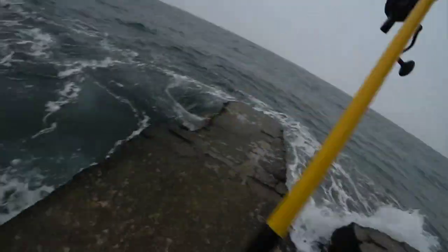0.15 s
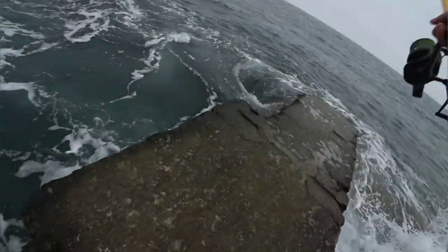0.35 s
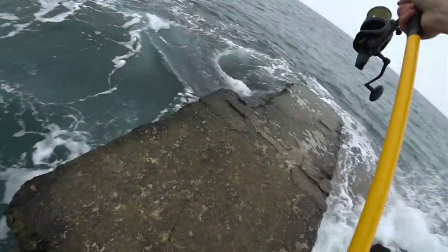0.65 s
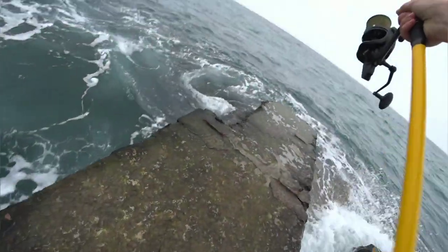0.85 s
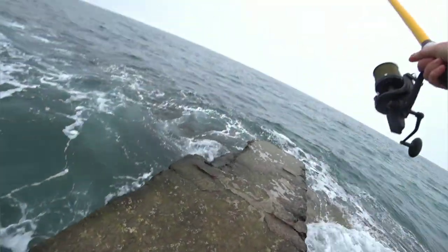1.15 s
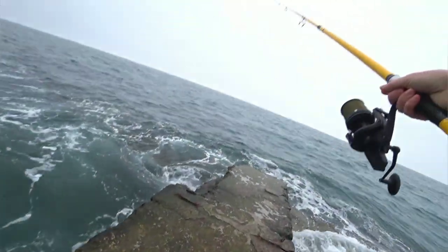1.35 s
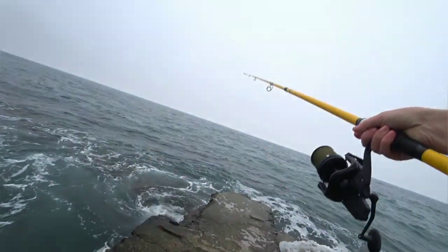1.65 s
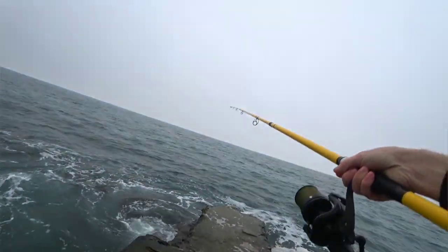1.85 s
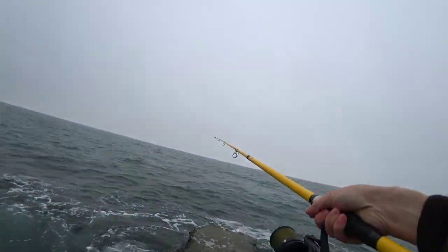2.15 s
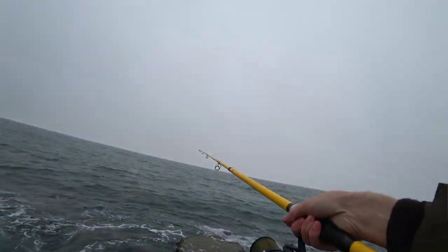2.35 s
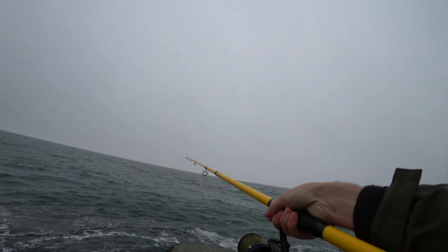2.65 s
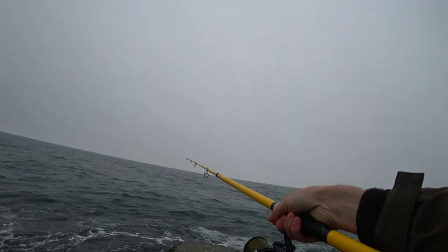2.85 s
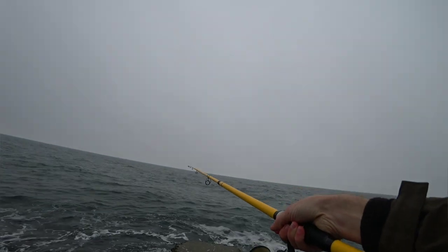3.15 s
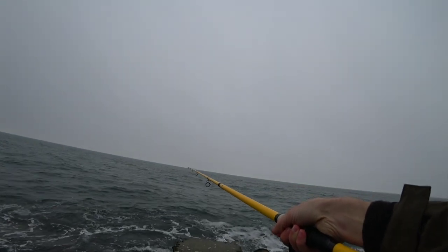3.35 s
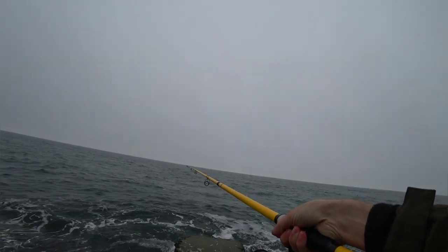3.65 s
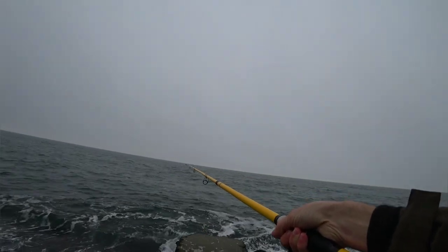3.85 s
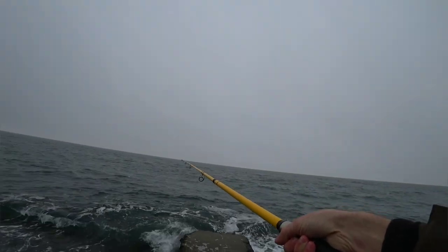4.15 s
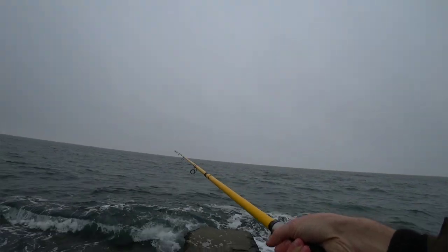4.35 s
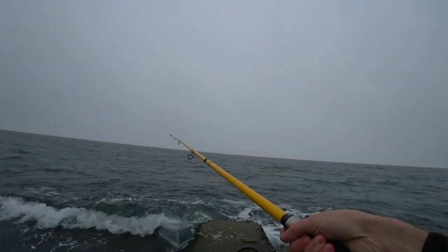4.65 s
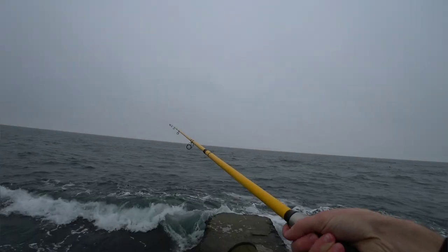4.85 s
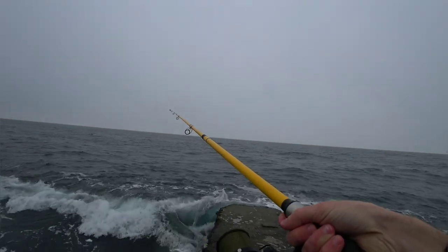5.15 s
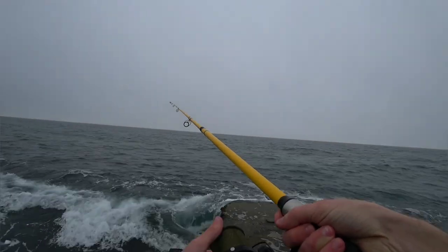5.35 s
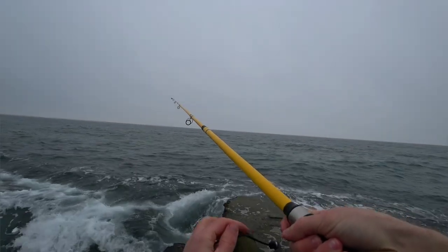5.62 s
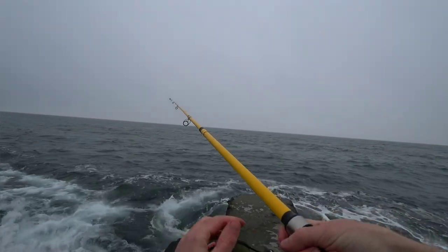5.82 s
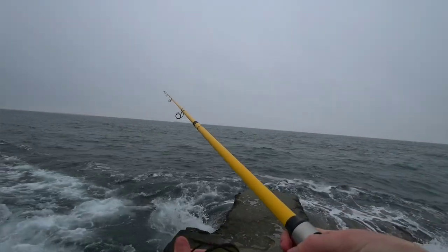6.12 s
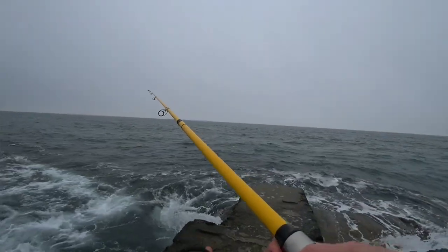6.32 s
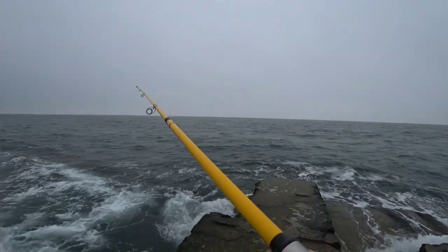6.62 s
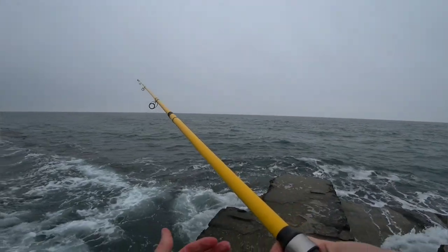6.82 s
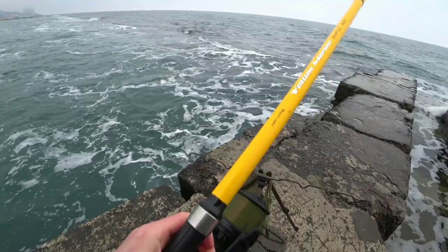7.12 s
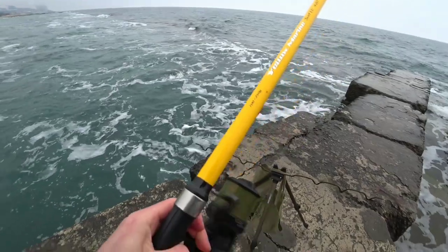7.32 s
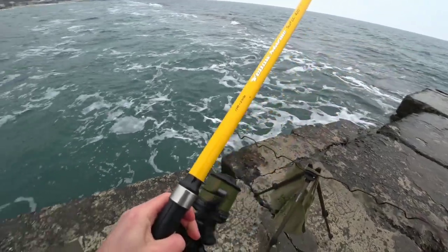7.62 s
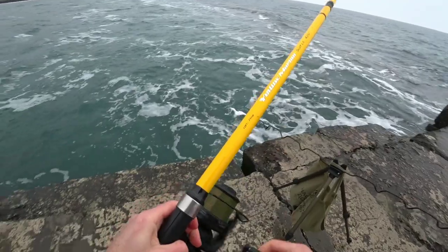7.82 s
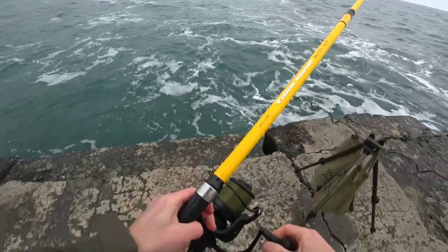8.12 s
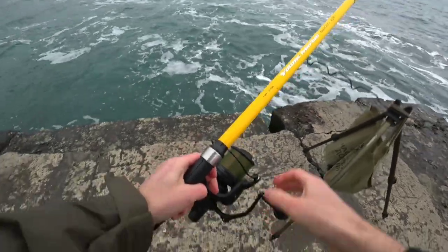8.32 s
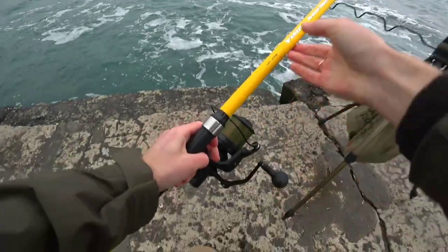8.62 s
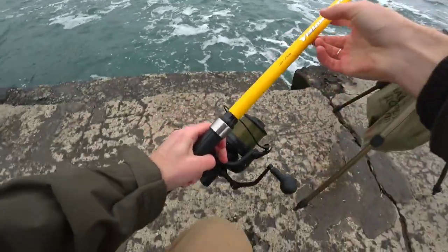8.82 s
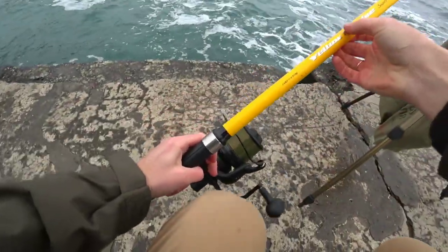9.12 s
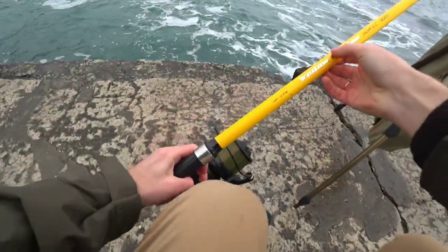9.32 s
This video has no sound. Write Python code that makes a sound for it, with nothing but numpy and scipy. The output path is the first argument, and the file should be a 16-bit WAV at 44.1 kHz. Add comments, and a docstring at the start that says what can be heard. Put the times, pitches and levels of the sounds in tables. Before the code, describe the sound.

Storm surf on a concrete pier, heard close up in open air, a dense grainy hiss of foam over a modest low roar. Tiny metallic tackle clicks come at 0 and 0.3 s. A wave swells at 0.7 s and slaps the blocks around 0.85 s, with a sharp click at 1.4 s. From 1.1 to 3.4 s, a reel whirs in five brief, thin, high metallic swells, about half a second apart, as the wash sinks. At 4.2 s foam rushes up again and stays strong and churning. One loud, bright clack strikes at 5.5 s; splashes and clicks at 6.5 s, then a double wet thump with rattle at 6.8 s. Just before 7 s an abrupt cut drops to far quieter, softer wash, with faint clicks, light slaps and a cluster of close drips around 8 s, fading gently until 9.5 s.

```python
"""Storm surf and a fishing reel

Storm waves wash over the concrete blocks of a pier while an angler winds a reel.
The surf is flickering bands of noise with sparse pops; bursts, foam and ringing drops stand out of it.
The reel sings as narrow metal resonances, one swell per handle turn, and its tackle clicks now and then.
At about 7 s the scene cuts, with a brief dip in level, to a quieter stretch of wash.
"""
import sys
import numpy as np
from scipy import signal
from scipy.fft import rfft, irfft, next_fast_len
from scipy.io import wavfile
from scipy.ndimage import uniform_filter1d

SR = 44100
rng = np.random.default_rng(int(sys.argv[2]) if len(sys.argv) > 2 else 0)


def file_out(sig):
    """Save sig as 16-bit WAV at sys.argv[1]."""
    # one column per channel
    cols = np.atleast_2d(sig).T
    # limit, then scale
    lim = np.clip(cols, -1, 1)
    pcm = np.round(lim * 32767).astype(np.int16)
    wavfile.write(sys.argv[1], SR, pcm)


N = 417627
STEP = 32   # samples between control points

# Surf level, one list before and one after the cut between scenes: start_s, roar_db, wash_db
SURF_LEVELS = [
    [(0.0, -32, -33), (0.33, -31.5, -34.5), (0.52, -34.5, -32), (0.76, -29.5, -28), (0.91, -32.5, -28),
     (1.14, -34, -32), (1.92, -38, -40.5), (2.11, -36.5, -38.5), (2.31, -35, -39.5), (2.62, -36.5, -38.5),
     (3.07, -34.5, -35), (3.37, -37, -37.5), (3.65, -34.5, -36), (4.02, -38.5, -38), (4.27, -38, -33),
     (4.54, -32.5, -29), (4.66, -32, -30), (5.08, -32.5, -29.5), (5.37, -33.5, -32), (5.59, -33.5, -31),
     (5.78, -30.5, -31), (6.13, -33, -32), (6.46, -32, -30), (6.81, -32.5, -34), (6.93, -31.5, -33.5),
     (6.97, -33, -35)],
    [(6.97, -39.5, -44), (7.11, -43, -43), (7.45, -41, -41), (7.72, -44, -44.5), (8.09, -41.5, -43.5),
     (8.59, -43.5, -46), (9.13, -45.5, -48), (9.32, -46.5, -50), (9.47, -44, -50)],
]
# Slower changes of the surf: start_s, rumble_db (against roar), fizz_db, spray_db (against wash),
# side_db (left over right, where the waves come from)
SURF_BALANCE = [(0, -11, -1, -12, -2.5), (.4, -10.5, -4, -13.5, -4), (.85, -12.5, -3, -13.5, -6),
                (1.3, -9.5, -6.5, -15, -3.5), (2, -13, -5, -12, -3.5), (3.2, -9.5, -6, -14, -3.5),
                (3.7, -8.5, -3.5, -15.5, -2.5), (4.3, -9.5, -3, -13.5, 1.5), (5.1, -9.5, -2.5, -13.5, 0.5),
                (6.1, -10.5, -4.5, -15.5, 0), (6.4, -11.5, -6.5, -19, -2), (6.9, -12, -4.5, -14, -2),
                (7.3, -6.5, -5, -15.5, -5.5), (8.2, -9.5, -8, -16.5, -4), (9.47, -4.5, -9.5, -14.5, -1.5)]
# Wind on the microphone: start_s, level_db
WIND_GUSTS = [(0.0, -65), (0.45, -85), (1.34, -88), (1.42, -71), (1.53, -80), (3.82, -70), (4.06, -82),
              (4.56, -72), (7.7, -90), (9.44, -83), (9.47, -76)]
# Registers of wind, rumble, roar, wash, fizz and spray: low_hz, high_hz
SURF_REGISTERS = [(25, 80), (110, 400), (400, 1400), (1400, 4000), (4000, 6500), (8200, 11000)]
# Tone colour of the sea before the registers are levelled: pitch_hz, density_db (per Hz)
SEA_COLOUR = [(15, -68), (25, -45), (107, -21), (299, -2.5), (511, -4.5), (713, -1.5), (5110, -14.5),
              (10500, -16.5), (11300, -22), (14700, -56), (22000, -120)]
# Depth of the flicker in each band: pitch_hz, flicker_db
FLICKER_DEPTH = [(30, 6), (100, 4), (1000, 1.35), (3000, 1), (10000, 1.4)]
# Likeness of left and right: pitch_hz, likeness (0-1)
STEREO_LIKENESS = [(60, 0.66), (200, 0.93), (400, 1), (1000, 0.79), (2000, 1), (5000, 0.88), (10000, 0.48)]
# How far the left channel leads the right: pitch_hz, lead_radians
LEFT_LEAD = [(60, .3), (200, 0.23), (500, 0.84), (1000, 1.04), (2000, 1.13), (4000, 0.72), (7500, 0.05),
             (11000, 0.05)]
# Inverted echo off the blocks: start_s, notch_spacing_hz, strength (0-1)
BLOCK_ECHO = [(0, 2630, 0.06), (.6, 2550, 0.15), (1.1, 2690, 0.26), (1.5, 2350, 0), (2.5, 2370, 0.25),
              (4.0, 2300, 0.06), (4.35, 2100, 0.2), (4.95, 1990, 0.16), (5.25, 2040, 0), (5.7, 2300, 0),
              (7.0, 2680, 0.1), (9.47, 2650, 0.1)]
# A band of the wash standing out as foam rushes by: start_s, length_s, level_db, pitch_hz, width_hz
FOAM_SURGES = [(0.697, 0.24, -32.5, 1500, 900), (0.72, 0.49, -37.5, 3900, 1600),
               (4.27, 0.76, -38.5, 5100, 800), (4.25, 0.29, -41, 2900, 650), (5.7, 0.28, -39, 830, 400),
               (6.45, 0.16, -36, 2900, 3000), (7.22, 0.25, -47, 1300, 1000), (7.0, 0.73, -54.5, 6700, 1200),
               (7.8, 0.72, -55, 3400, 2300)]
# Water thumping and spattering on a block: start_s, level_db, t60_s, pitch_hz
BLOCK_SLAPS = [(.77, -36, .15, 400), (.829, -28, .12, 1700), (0.862, -23, 0.17, 1180),
               (1.001, -30, .2, 4000), (4.14, -35, 0.11, 3000), (6.519, -29, 0.22, 2500),
               (6.552, -32.5, 0.28, 5500), (6.8195, -24, 0.07, 550), (6.827, -20.5, .09, 600),
               (6.837, -26, .12, 1200), (6.92, -28.5, 0.18, 805), (7.36, -43, .2, 1800),
               (7.855, -44, .09, 3000), (8.042, -43, 0.22, 2500), (9.015, -55, .15, 5500),
               (9.284, -38.5, .07, 2100)]
# Metal tones of the reel: pitch_hz, width_hz (of the narrower resonance)
REEL_TONES = [(6805, 80), (7840, 85), (5670, 70), (5800, 70)]
# Handle turns: start_s, length_s, then level_db of each of the four reel tones
HANDLE_TURNS = [(1.06, 0.25, -54, -48, -62, -60), (1.505, .25, -48, -52, -59, -49),
                (1.982, 0.26, -44.5, -53, -57, -62), (2.52, 0.29, -48, -53, -55, -62),
                (3.12, 0.25, -49.5, -55, -60, -62)]
# Rings of rod and reel: pitch_hz, width_hz (of the narrower resonance)
TACKLE_RINGS = [(2215, 260), (3140, 240), (3690, 360), (4750, 400), (5520, 380), (6400, 1100), (7420, 550),
                (8520, 550), (10000, 2400)]
# Clicks of the tackle: start_s, side_db (left over right), then peak_db of each of the nine rings
TACKLE_CLICKS = [(.022, -1, -50, -50, -50, -50, -45, -40, -26, -36, -40),
                 (.0533, -1, -40, -40, -40, -25, -30, -32, -32, -38, -40),
                 (.2565, -2, -40, -40, -40, -40, -34, -40, -29, -32, -31),
                 (.2645, -2, -40, -32, -40, -40, -36, -40, -40, -30, -30),
                 (.2722, -2, -45, -45, -40, -29, -33, -45, -45, -45, -45),
                 (.2784, -5, -40, -35, -19.5, -21.5, -45, -45, -45, -45, -45),
                 (.2847, 7, -40, -40, -40, -40, -40, -45, -32, -26, -16),
                 (1.4404, 4, -15, -33, -30, -21, -21, -45, -26, -50, -45),
                 (3.1544, -2, -50, -45, -50, -50, -45, -45, -50, -50, -27),
                 (5.4706, -2.5, -30, -17, -13, -27, -21, -10.5, -18, -15, -3.5),
                 (6.56, 1, -23, -25, -28, -30, -30, -32, -35, -38, -38),
                 (6.7668, 2, -40, -35, -23.5, -35, -42, -42, -45, -45, -45),
                 (6.8194, -1, -30, -30, -29, -32, -28, -26, -28, -26, -25),
                 (6.8274, -1, -21, -30, -30, -27, -27, -28, -29, -24, -23),
                 (7.116, -1, -50, -50, -50, -50, -50, -48, -36, -46, -46),
                 (8.048, -4, -48, -48, -48, -48, -48, -48, -36, -39, -42),
                 (8.056, -4, -38, -42, -42, -42, -46, -46, -41, -41, -44)]
# Single drops near the microphone: start_s, peak_db, pitch_hz
CLOSE_DROPS = [(7.528, -36, 4300), (7.857, -31, 3000), (7.864, -35, 3300), (7.997, -38, 3400),
               (8.006, -30, 2650), (8.064, -36, 2500), (8.085, -37, 4700), (8.101, -36, 4650),
               (8.158, -38, 3300), (8.267, -37, 2500), (8.268, -37, 3200), (8.334, -37, 3800),
               (8.465, -40, 2900), (9.2785, -38, 2900), (9.284, -38, 1750)]
# Shower of small drops: start_s, level_db (against wash)
DRIP_LEVEL = [(0, -7), (3, -10.5), (6.9, -16), (7.6, -15), (7.9, -8), (8.4, -9), (8.7, -20), (9.47, -12)]

SURGE_CLUMP_DB, SURGE_CLUMP_HZ = 2.5, 30   # spread and rate of the foam's unevenness
SLAP_WIDTH, SLAP_RISE_S = 0.96, 0.0022   # width over centre pitch; rise time
GEAR_TICKS_PER_S, GEAR_RUB = 120, 0.8   # uneven contacts; share of steady rubbing (0-1)
MAIN_ARCH, SIDE_ARCH = 0.3, 0.7   # powers of a turn's half sine: side tones speak nearer its height
CHATTER_S, SPATTER_S = 0.0028, 0.0045   # time for the noise of a click or close drop to fall 30 dB
RING_SAMPLES = 1500   # length of a click or close drop
DROP_SHARPNESS = 8.6   # pitch over width
DRIPS_PER_S = 120
CUT_S, DIP_HALF_WIDTH_S, DIP_FLOOR_GAIN = 6.9705, 0.002, 0.15
LIMIT_DB, RECOVERY_DB_PER_S, LOOK_AHEAD = -5, 150, 200   # look-ahead in samples
CUTOFF_HZ = 11070


def from_db(db):
    """Decibels to gain."""
    return 10 ** (np.asarray(db) / 20)


def rms_one(x):
    """Scale to rms 1."""
    return x / np.sqrt(np.mean(x ** 2) + 1e-20)


def control_times():
    """Time in seconds of each control point."""
    return np.arange(N // STEP + 2) * STEP / SR


def coarse(rows):
    """Columns of a time table, read on the control grid."""
    times_s, *columns = np.transpose(rows)
    return np.array([np.interp(control_times(), times_s, column) for column in columns])


def fine(control):
    """Control grid to samples."""
    return np.interp(np.arange(N) / STEP, np.arange(len(control)), control)


def at_hz(points, hz):
    """Read a curve on a log-frequency axis."""
    pitches, values = np.array(points).T
    return np.interp(np.log(hz), np.log(pitches), values)


def drift(rate_hz):
    """Smoothed chance on the control grid, spread 1."""
    r = np.exp(-2 * np.pi * rate_hz * STEP / SR)
    chance = rng.standard_normal(N // STEP + 2002)
    return rms_one(signal.lfilter([1], [1, -2 * r, r * r], chance)[2000:])


def arch(t, start_s, length_s):
    """Half a sine over the given length."""
    return np.sin(np.pi * np.clip((t - start_s) / length_s, 0, 1)).clip(0)


def resonance(x, hz, width_hz):
    """Two-pole resonance, gain about 1 at its pitch."""
    r = np.exp(-np.pi * width_hz / SR)
    feedback = [1, -2 * r * np.cos(2 * np.pi * hz / SR), r * r]
    return signal.lfilter(np.array([1, 0, -1]) * (1 - r * r) / 2, feedback, x)


def double_resonance(x, hz, width_hz, widening=2):
    """A resonance followed by a wider one at the same pitch, for steeper skirts."""
    return resonance(resonance(x, hz, width_hz), hz, widening * width_hz)


def panned(x, side_db):
    """Mono to two channels; side_db is left over right."""
    return np.array([x * from_db(side_db / 2), x * from_db(-side_db / 2)])


def bubble_noise(hz, size):
    """Stereo spectrum of merged bubbles: dense noise with sparse bursting pops, coloured like the sea."""
    pop_gain = from_db(3.9 * np.minimum(rng.exponential(1, size), 3))
    pops = (rng.random(size) < 2500 / SR) * pop_gain * rng.choice([-1, 1], size)
    pop_share = at_hz([(500, 0.087), (3000, 0.17), (10000, 0.37)], hz)
    dense = rfft(rng.standard_normal(size))
    common = np.sqrt(1 - pop_share) * dense + np.sqrt(pop_share) * rfft(rms_one(pops))
    opposed = rfft(rng.standard_normal(size))
    alike = at_hz(STEREO_LIKENESS, hz)
    pair = np.sqrt(1 + alike) * common + np.sqrt(1 - alike) * opposed * [[1], [-1]]
    return from_db(at_hz(SEA_COLOUR, hz)) * pair


def surf():
    """Countless bubbles merge into noise; third-octave bands swell with the wave and flicker in patches."""
    size = next_fast_len(N)
    hz = np.maximum(np.arange(size // 2 + 1) * SR / size, 1)
    pair = bubble_noise(hz, size)

    roar_db, wash_db = coarse(sum(SURF_LEVELS, []))
    rumble_db, fizz_db, spray_db, side_db = coarse(SURF_BALANCE)
    wind_db = coarse(WIND_GUSTS)[0]
    levels_db = np.array([wind_db, roar_db + rumble_db, roar_db,
                          wash_db, wash_db + fizz_db, wash_db + spray_db])
    # take off the level each register already has in the sea's colour
    power = from_db(at_hz(SEA_COLOUR, hz)) ** 2
    plain_db = [10 * np.log10(4 * np.sum(power[(hz > low) & (hz < high)]) / size)
                for low, high in SURF_REGISTERS]
    swell_db = levels_db - np.array(plain_db)[:, None]
    middles = np.log([np.sqrt(low * high) for low, high in SURF_REGISTERS])

    splash = drift(15)   # shared by all bands
    neighbour = drift(4.3)
    thirds = 3 * np.log2(hz / 25)
    out = np.zeros((2, N))
    for k in range(28):
        centre_hz = 25 * 2 ** (k / 3)
        band = irfft(pair * np.clip(1 - np.abs(thirds - k), 0, 1), size)[:, :N]
        # blend the levels of the two nearest registers
        place = np.interp(np.log(centre_hz), middles, np.arange(6))
        gain_db = np.clip(1 - np.abs(np.arange(6) - place), 0, 1) @ swell_db
        # patches spread over nearby bands
        neighbour = 0.964 * neighbour + 0.17 * drift(15)
        splash_share = at_hz([(200, 0.15), (2000, 0.48)], centre_hz)
        flicker = splash_share * splash + 0.2 * neighbour + 0.66 * drift(32)
        gain_db = gain_db + at_hz(FLICKER_DEPTH, centre_hz) * flicker
        # the bass follows the side of the waves least
        side_share = at_hz([(150, 0.086), (600, 0.32), (2500, 1)], centre_hz)
        fixed_side_db = at_hz([(150, -0.44), (900, -1.3), (4000, 0.76)], centre_hz)
        pan_db = side_share * side_db + fixed_side_db
        out[0] += band[0] * fine(from_db(gain_db + pan_db / 2))
        out[1] += band[1] * fine(from_db(gain_db - pan_db / 2))
    return out


def off_the_blocks(x):
    """An inverted echo from the concrete, a fraction of a millisecond late, combs the treble."""
    notch_hz, strength = coarse(BLOCK_ECHO)
    # the bass bends round the blocks, the top scatters
    treble = signal.filtfilt(*signal.butter(1, [2300, 6800], "band", fs=SR), x)
    late = np.arange(N) - SR / fine(notch_hz)
    echo = np.array([np.interp(late, np.arange(N), side) for side in treble])
    return x - fine(strength) * echo


def surges():
    """Rushing foam is clumpy noise in one broad resonance, swelling and fading."""
    t, out = control_times(), 0
    side_db = fine(coarse(SURF_BALANCE)[3])
    for start_s, length_s, level_db, hz, width_hz in FOAM_SURGES:
        foam = rms_one(double_resonance(rng.standard_normal(N), hz, width_hz))
        clumps_db = SURGE_CLUMP_DB * drift(SURGE_CLUMP_HZ)
        out = out + foam * fine(arch(t, start_s, length_s) ** 0.47 * from_db(level_db + clumps_db))
    return panned(out, side_db)


def slaps():
    """Water hitting a block is a burst of broad noise that rises in about 2 ms and dies fast."""
    length = SR // 4
    out, t = np.zeros(N + SR), np.arange(length) / SR
    for start_s, level_db, t60_s, hz in BLOCK_SLAPS:
        burst = rms_one(double_resonance(rng.standard_normal(length), hz, SLAP_WIDTH * hz))
        envelope = from_db(level_db - 60 * t / t60_s) * np.minimum(t / SLAP_RISE_S, 1)
        at = round(start_s * SR)
        out[at:at + length] += burst * envelope
    return out[:N]


def reel():
    """Uneven gear contacts and rubbing excite narrow metal resonances; each handle turn is one swell."""
    t, sing = control_times(), 0
    ticks = rms_one(rng.standard_normal(N) * (rng.random(N) < GEAR_TICKS_PER_S / SR))
    for k, (hz, width_hz) in enumerate(REEL_TONES):
        power = SIDE_ARCH if k else MAIN_ARCH
        swell = sum(from_db(tones_db[k]) * arch(t, start_s, length_s) ** power
                    for start_s, length_s, *tones_db in HANDLE_TURNS)
        contact = np.sqrt(GEAR_RUB) * rng.standard_normal(N) + np.sqrt(1 - GEAR_RUB) * ticks
        ring = rms_one(double_resonance(contact, hz, width_hz, widening=3))
        sing = sing + fine(swell * from_db(1.8 * drift(25))) * ring
    return panned(sing, -2.7)


def clicks():
    """Each contact is an impulse and a few milliseconds of chatter that set the tackle ringing."""
    out, t = np.zeros((2, N)), np.arange(RING_SAMPLES) / SR
    for start_s, side_db, *peaks_db in TACKLE_CLICKS:
        noise = rng.standard_normal(RING_SAMPLES)
        chatter = 0.18 * noise * from_db(-30 * t / CHATTER_S) + (t == 0)
        sound = 0
        for k, ((hz, width_hz), peak_db) in enumerate(zip(TACKLE_RINGS, peaks_db)):
            ring = double_resonance(chatter, hz, width_hz)
            # neighbouring rings start with opposite sign
            sound = sound + (-1) ** k * from_db(peak_db) * ring / np.abs(ring).max()
        at = round(start_s * SR)
        out[:, at:at + RING_SAMPLES] += panned(sound, side_db)
    return out


def near_drops():
    """Each close drop is an impulse and a short spatter ringing at its own pitch."""
    out, t = np.zeros(N + SR), np.arange(RING_SAMPLES) / SR
    for start_s, peak_db, hz in CLOSE_DROPS:
        noise = rng.standard_normal(RING_SAMPLES)
        spatter = 0.2 * noise * from_db(-30 * t / SPATTER_S) + (t == 0)
        ring = double_resonance(spatter, hz, hz / DROP_SHARPNESS)
        at = round(start_s * SR)
        out[at:at + RING_SAMPLES] += from_db(peak_db) * ring / np.abs(ring).max()
    return panned(out[:N], -3.5)


def droplets():
    """Lone drops and small splashes, dealt at random to ten pitches, ring a few cycles each."""
    sizes = from_db(4.5 * np.minimum(rng.exponential(1, N), 3)) * (rng.random(N) < DRIPS_PER_S / SR)
    dealt = rng.integers(0, 10, N)
    rings = 0
    for k, hz in enumerate(np.geomspace(1500, 5500, num=10)):
        drops = sizes * (dealt == k) + 1e-18   # the tiny offset keeps the filter out of denormals
        rings = rings + resonance(drops, hz, hz / 12) / hz
    wash_db = coarse(sum(SURF_LEVELS, []))[1]
    level_db = wash_db + coarse(DRIP_LEVEL)[0]
    return panned(rms_one(rings) * fine(from_db(level_db)), -2.5)


def scene():
    """All sources together; the level dips for an instant at the cut between scenes."""
    from_cut_s = np.abs(np.arange(N) / SR - CUT_S)
    dip = np.clip(from_cut_s / DIP_HALF_WIDTH_S, DIP_FLOOR_GAIN, 1)
    sea = off_the_blocks(surf() + droplets())
    return dip * (sea + reel() + clicks() + slaps() + surges() + near_drops())


def limiter(x):
    """Peaks over the limit pull the gain down just before they pass; it climbs back steadily."""
    peak_db = 20 * np.log10(np.abs(x).max(axis=0) + 1e-9)
    over_db = np.maximum(peak_db - LIMIT_DB, 0)
    climb_db = RECOVERY_DB_PER_S * np.arange(N) / SR
    cut_db = np.maximum.accumulate(over_db + climb_db) - climb_db
    smooth_db = uniform_filter1d(cut_db, size=LOOK_AHEAD)
    return x * from_db(-np.roll(smooth_db, -LOOK_AHEAD // 2))


def record(dry):
    """The right channel lags by a phase that depends on pitch; a limiter ducks peaks; the top is cut."""
    size = next_fast_len(N + 4096)
    hz = np.maximum(np.arange(size // 2 + 1) * SR / size, 1)
    lag = np.exp(-1j * at_hz(LEFT_LEAD, hz))
    right = irfft(rfft(dry[1], size) * lag, size)[:N]
    top_cut = signal.ellip(9, 0.3, 45, CUTOFF_HZ, fs=SR, output="sos")
    return signal.sosfilt(top_cut, limiter(np.array([dry[0], right])))


dry = scene()
out = record(dry)
file_out(out)
```